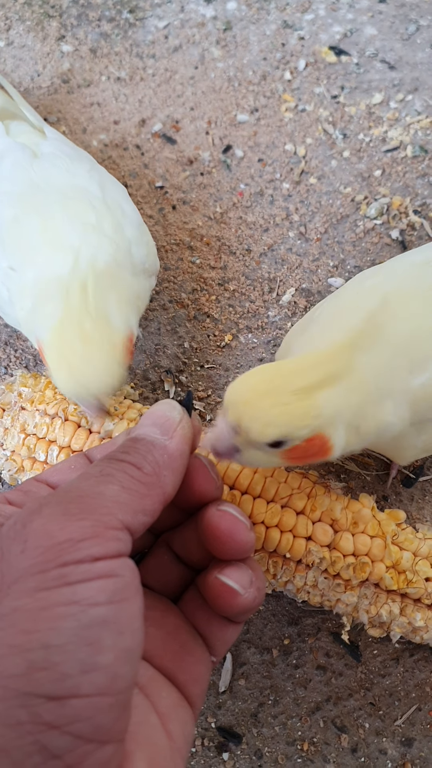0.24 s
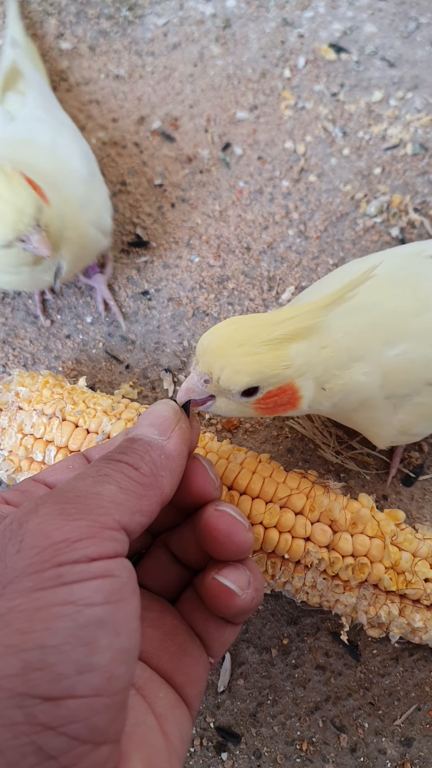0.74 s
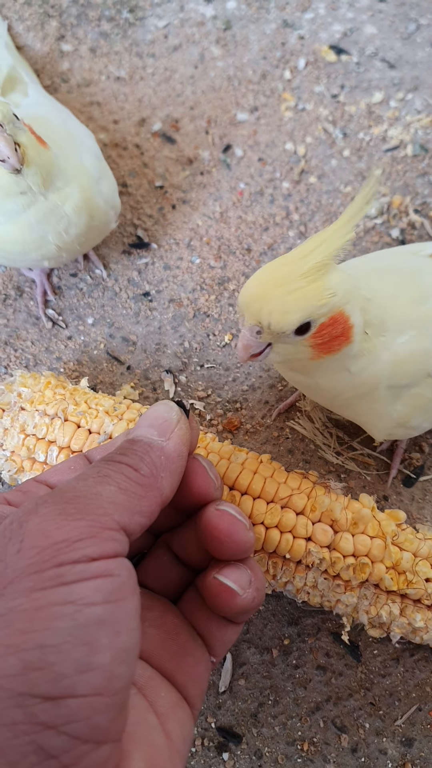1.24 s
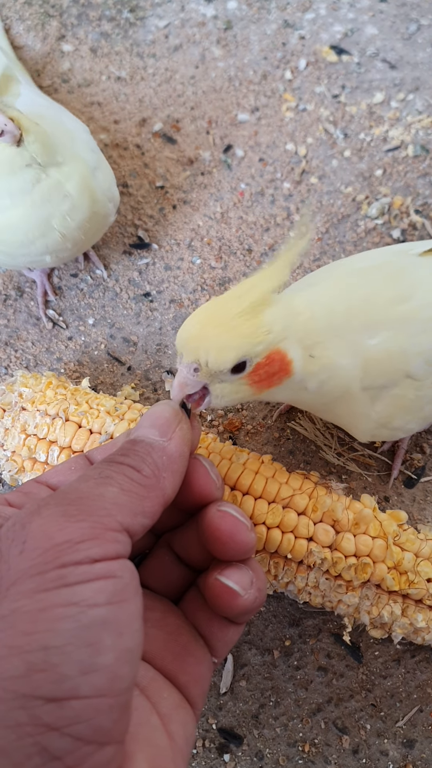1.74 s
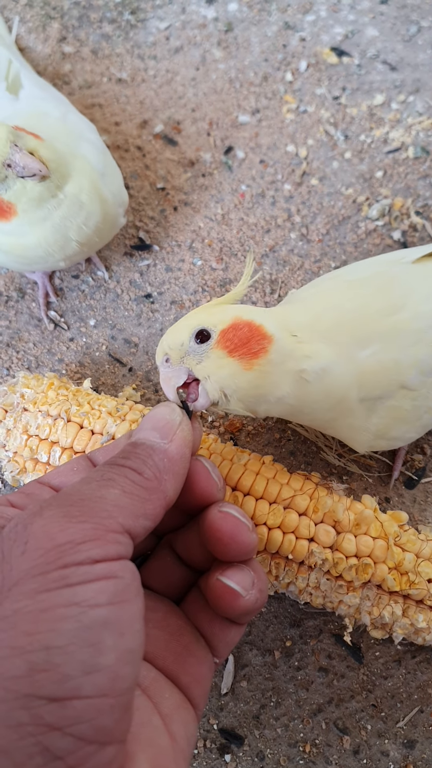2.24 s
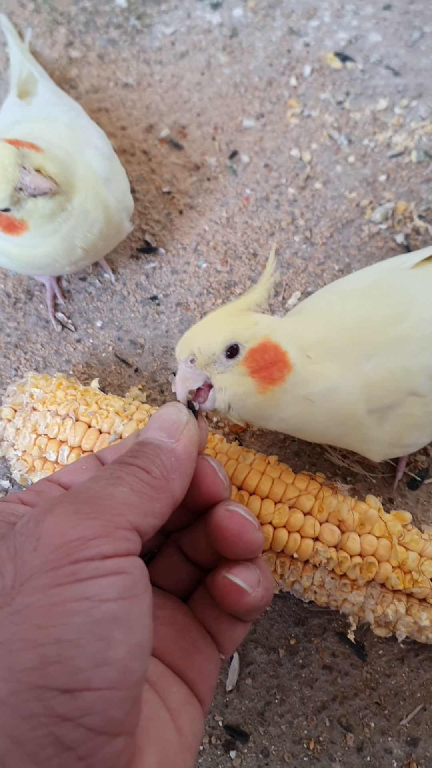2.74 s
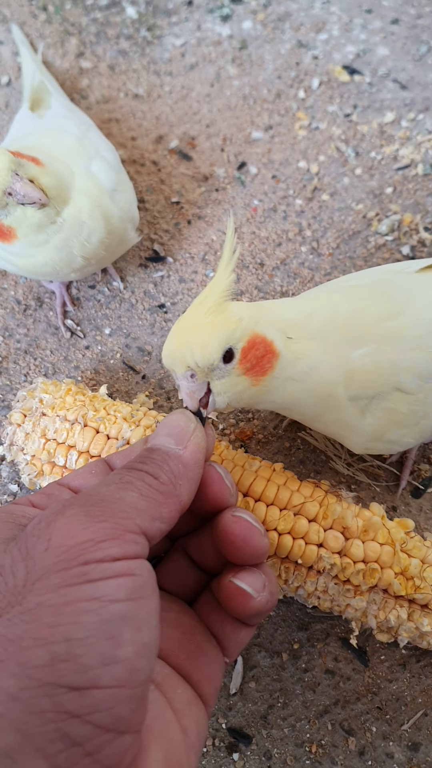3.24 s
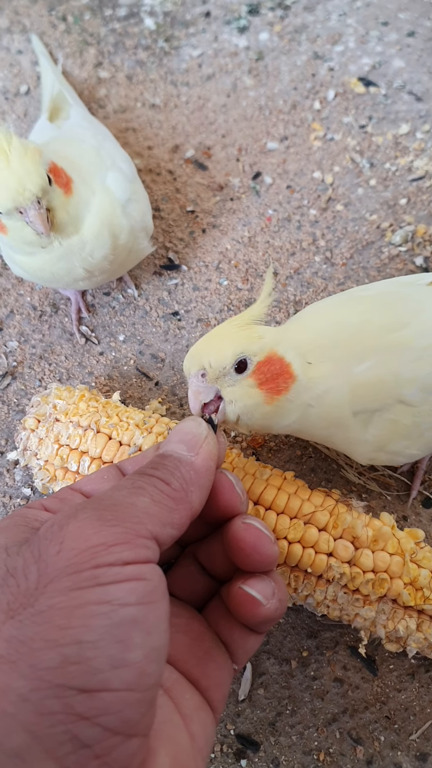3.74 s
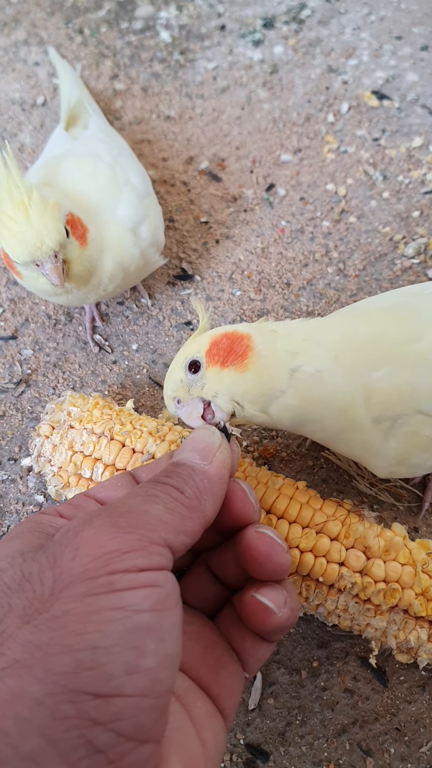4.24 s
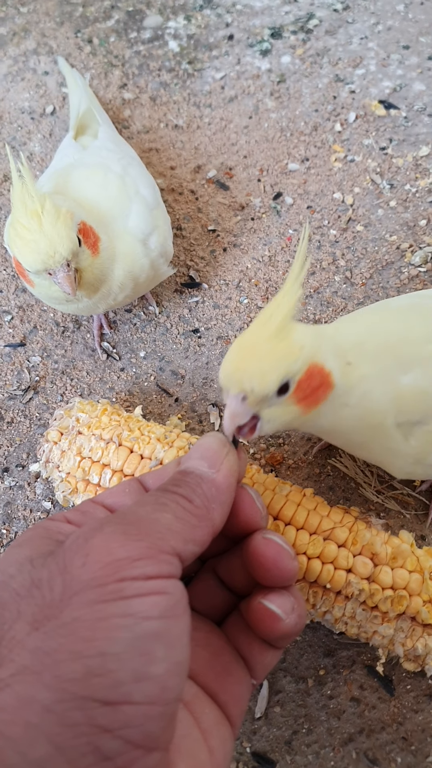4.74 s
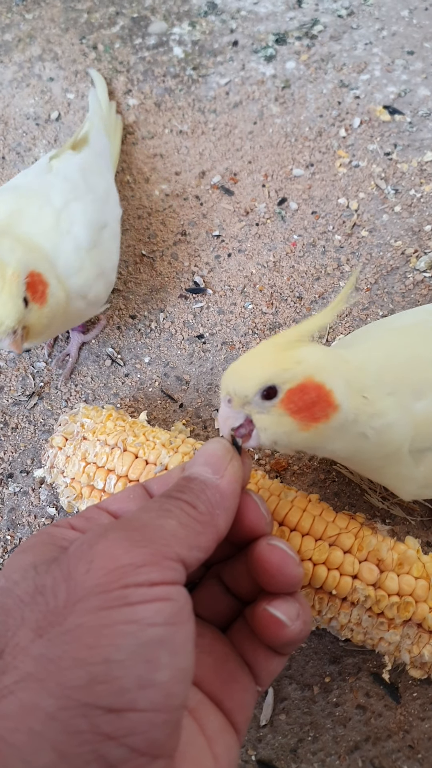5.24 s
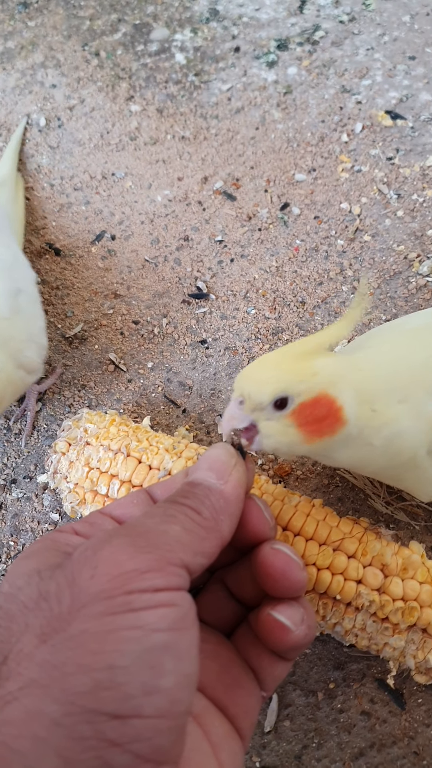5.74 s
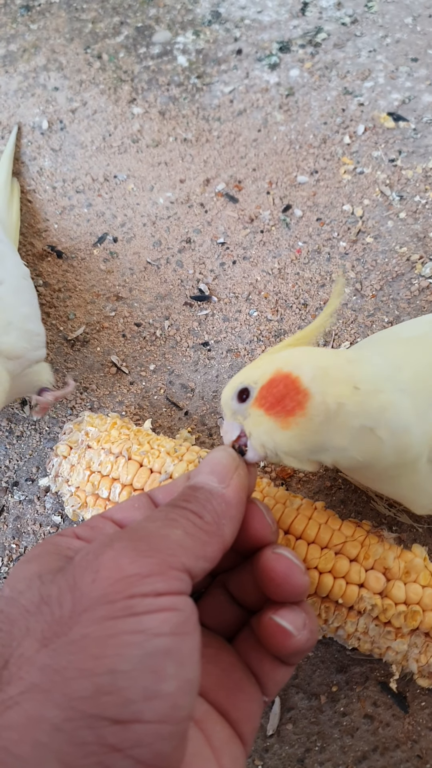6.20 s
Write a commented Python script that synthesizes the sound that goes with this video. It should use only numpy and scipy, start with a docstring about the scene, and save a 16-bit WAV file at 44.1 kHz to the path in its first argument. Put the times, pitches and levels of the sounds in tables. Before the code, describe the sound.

Cockatiels give loud, raspy, rising and arching calls in an echoing hard-walled yard, with tiny seed-husk snaps close up over a low hum.

```python
"""Cockatiels call in a hard-walled yard while one of them cracks seeds from a hand close to the phone.
Each call is a raspy stack of overtones that arches or climbs in two steps, louder as it rises.
Dense echoes from the walls hold every pitch on, so the glides smear; the seed husks are short noise snaps.
Knocks (noise and ringing tones) come mostly by way of the walls; the soft bumps are swells of dull noise.
Beneath lie outdoor noise, a fading hiss, fluttering rumble, a wavering machine hum and a faint low tone."""
import sys
import numpy as np
from scipy import signal
from scipy.fft import rfft, irfft, next_fast_len
from scipy.io import wavfile
from scipy.ndimage import uniform_filter1d, minimum_filter1d

SR = 44100
rng = np.random.default_rng(int(sys.argv[2]) if len(sys.argv) > 2 else 0)


def generate_wav(sig):
    """Save sig (samples, or channels by samples) to the path in sys.argv[1] as 16-bit PCM at SR."""
    pcm = np.round(np.clip(np.atleast_2d(sig).T, -1, 1) * 32767).astype(np.int16)
    wavfile.write(sys.argv[1], SR, pcm)


N = 285327
TIME = np.arange(N) / SR


def undb(db):
    """Decibels to gain."""
    return 10 ** (np.asarray(db) / 20)


def unit(x):
    """Scale to rms 1."""
    return x / np.sqrt(np.mean(x ** 2))


def at_hz(points, hz):
    """Read (Hz, value) points on a log-frequency axis."""
    point_hz, value = np.transpose(points)
    return np.interp(np.log(np.maximum(hz, 1)), np.log(point_hz), value)


def colour(x, points, tilt_db=0, pivot_hz=4000):
    """Filter x by a curve of (Hz, dB) points, tilted by so many dB an octave around the pivot."""
    hz = np.maximum(np.fft.rfftfreq(x.shape[-1], 1 / SR), 1)
    gain_db = at_hz(points, hz) + tilt_db * np.log2(hz / pivot_hz)
    return irfft(rfft(x) * undb(gain_db), x.shape[-1])


def wander(rate_hz, size=N):
    """Smooth random motion up to a rate, rms 1."""
    hz = np.fft.rfftfreq(size, 1 / SR)
    lowpass = 1 / (1 + (hz / rate_hz) ** 4)
    return unit(irfft(rfft(rng.standard_normal(size)) * lowpass, size))


def air_noise(points, alike_hz=520):
    """Diffuse noise at two microphone ports: alike in the bass, unrelated in the treble."""
    hz = np.fft.rfftfreq(N, 1 / SR)
    alike = 1 / (1 + (hz / alike_hz) ** 2.8)
    spectra = rfft(rng.standard_normal((2, next_fast_len(N))))[:, :len(hz)]
    mid, side = spectra * np.sqrt([1 + alike, 1 - alike]) * undb(at_hz(points, hz))
    return unit(irfft([mid + side, mid - side], N))


def add(out, x, start_s):
    """Mix x into out from a start time on."""
    i = max(int(start_s * SR), 0)
    out[..., i:i + x.shape[-1]] += x[..., :out.shape[-1] - i]


def ramp(t, start_s, length_s):
    """Go from 0 to 1 over a length of time."""
    return np.clip((t - start_s) / length_s, 0, 1)


def swell(when_s, spread_s):
    """A smooth bell-shaped rise and fall around a moment."""
    return np.exp(-.5 * ((TIME - when_s) / spread_s) ** 2)


# spectrum of the open air around the yard: freq_hz, relative density_db (per Hz)
AMBIENT_SPECTRUM = [(25, -36.5), (48, -30.5), (64, -4), (86, 0.5), (172, -7.5), (250, -11.5), (335, -9.5),
                    (438, -18), (621, -11.5), (790, -18), (1120, -18.5), (2020, -27.5), (3000, -29.5),
                    (4200, -38.5), (6200, -40.5), (7600, -56.5), (11000, -56), (15000, -69)]


def ambient(level_db=-48.5, swell_db=1):
    """Outdoor noise from all around, its level wandering slightly."""
    return air_noise(AMBIENT_SPECTRUM) * undb(level_db + swell_db * wander(4))


# spectrum of the hiss: freq_hz, relative density_db (per Hz)
HISS_SPECTRUM = [(120, -26), (200, -4.5), (211, -11), (422, -19), (479, -2.5), (525, -29.5), (630, -8),
                 (874, -11.5), (3120, -10), (6130, -17.5), (7480, -31.5), (11000, -27.5), (15500, -32)]


def hiss(level_db=-50.5, hold_s=2.66, fade_db_per_s=11.5, rest_db=-68, flicker_db=1):
    """Coloured noise that holds, then fades down to a faint rest, flickering a little."""
    fade_db = fade_db_per_s * np.maximum(TIME - hold_s, 0)
    course_db = np.maximum(level_db - fade_db, rest_db)
    return air_noise(HISS_SPECTRUM) * undb(course_db + flicker_db * wander(17))


# spectrum of the rumble: freq_hz, relative density_db (per Hz)
RUMBLE_SPECTRUM = [(20, -19.5), (40, -1), (60, -1.5), (80, 12), (100, -6.5), (160, -10.5), (300, -16.5),
                   (700, -48.5)]
# moments when the rumble swells: centre_s, level_db (before the flutter), spread_s
RUMBLE_SWELLS = [(.6, -37.5, 0.14), (0.874, -38, 0.066), (1.32, -42, 0.17), (1.983, -42, 0.18),
                 (2.616, -43, 0.14), (4.85, -48.5, 0.041)]


def rumble(rest_db=-62, flutter_hz=11.5, flutter_db=3):
    """Bass noise swells out of a faint rest while its level flutters evenly."""
    strength = undb(rest_db)
    for centre_s, level_db, spread_s in RUMBLE_SWELLS:
        strength = strength + undb(level_db) * swell(centre_s, spread_s)
    flutter = undb(flutter_db * np.sin(2 * np.pi * flutter_hz * TIME))
    return air_noise(RUMBLE_SPECTRUM) * strength * flutter


# tones of the machine, lowest first: pitch_hz (centre), level_db (rms, before it wavers)
HUM_TONES = [(82, -50.5), (116, -54), (153, -57.5), (234, -60)]


def hum(drift_hz=3.545, swell_db=3, dip_at_s=4.25, dip_spread_s=0.23, dip_db=7.5):
    """Low machine tones that waver in pitch and strength; the lowest sinks for a moment."""
    tones = []
    for pitch_hz, level_db in HUM_TONES:
        strength = undb(level_db + swell_db * wander(17))
        phase = 2 * np.pi * np.cumsum(pitch_hz + drift_hz * wander(8.07)) / SR
        tones.append(strength * np.sin(phase))
    tones[0] = tones[0] * undb(-dip_db * swell(dip_at_s, dip_spread_s))
    return np.sqrt(2) * sum(tones)


# two short notes of the low tone: start_s, length_s, level_db (rms at the crest)
LOW_TONE_NOTES = [(0.22, 0.094, -48.5), (0.312, 0.076, -47)]


def low_tone(pitch_hz=725):
    """A faint sine sounds twice, briefly, behind the second call, each time under a half-sine arch."""
    strength = 0
    for start_s, length_s, level_db in LOW_TONE_NOTES:
        strength = strength + undb(level_db) * np.sin(np.pi * ramp(TIME, start_s, length_s))
    return np.sqrt(2) * strength * np.sin(2 * np.pi * pitch_hz * TIME)


# soft low bumps: centre_s, level_db, spread_s, pitch_hz (where the noise is strongest)
BUMPS = [(0.545, -50.5, 0.36, 404), (1.418, -49.5, 0.09, 256), (2.203, -48.5, 0.079, 468),
         (3.292, -42.5, 0.02, 203), (3.365, -44, 0.077, 167), (4.813, -65, 0.027, 150.4),
         (4.918, -43.5, 0.072, 200)]


def bumps():
    """Soft, dull bumps: noise strongest around one pitch that swells and fades."""
    out = 0
    for centre_s, level_db, spread_s, pitch_hz in BUMPS:
        band = [(pitch_hz / 3, -20), (pitch_hz, 0), (pitch_hz * 2, -10),
                (pitch_hz * 8, -40), (pitch_hz * 32, -65)]
        out = out + air_noise(band) * undb(level_db) * swell(centre_s, spread_s)
    return out


# how long the walls hold each frequency: freq_hz, t60_s (time to decay by 60 dB)
YARD_DECAY = [(300, .5), (1500, .46), (3000, .46), (4000, .39), (6000, .41), (10000, .38), (16000, .32)]


def yard(x, build_s=.006, early=0.94, early_s=0.032):
    """Dense wall echoes, stronger early on, with a decay time for each frequency; each port gets its own."""
    t = np.arange(SR) / SR
    hz, when_s, cells = signal.stft(rng.standard_normal((2, SR)), SR, nperseg=256)
    decay = np.exp(-np.log(1000) * when_s / at_hz(YARD_DECAY, hz)[:, None])
    tail = signal.istft(cells * decay, SR)[1][:, :SR]
    tail = tail * (1 - np.exp(-t / build_s)) * (1 + early * np.exp(-t / early_s))
    tail /= np.sqrt(np.sum(tail ** 2, axis=1, keepdims=True))  # unit energy
    return signal.fftconvolve(x, tail, axes=1)[:, :x.shape[1]]


# light knocks further off: start_s, level_db (before the paths), thud_db and ring_db (relative trims)
KNOCKS = [(0.856, -27, -22, -8.5), (1.911, -25, 3.5, -5), (2.548, -26, -18, -19), (3.489, -28, -13.5, 1.5)]
# spectrum of the sharp contact: freq_hz, gain_db
CONTACT_SPECTRUM = [(500, -5), (1500, -0.5), (3000, 4), (5000, 4.5), (7500, -12), (11000, -16.5),
                    (15000, -18.5)]
# what the knocks ring with: pitch_hz, level_db (relative), t60_s
KNOCK_RING = [(2180, -5.5, 0.22), (2930, 2, 0.041), (3220, -3, 0.39), (3644, -12.5, .2), (5000, -18, 0.17),
              (5210, -4, .16), (6200, -7.5, 0.22)]


def knocks(decay_s=0.0041, thud_hz=650, thud_s=0.025, ringing_db=-17, direct_db=-8, echo_db=-3):
    """A sharp noise contact, a dull noise thud and decaying tones, heard mostly by way of the walls."""
    out, t = np.zeros((2, N)), np.arange(SR // 3) / SR
    thud_band = signal.butter(2, [thud_hz / 2, thud_hz * 1.42], "band", fs=SR, output="sos")
    ring = 0
    for pitch_hz, level_db, t60_s in KNOCK_RING:
        ring = ring + undb(level_db) * np.sin(2 * np.pi * pitch_hz * t) * np.exp(-np.log(1000) * t / t60_s)
    for start_s, level_db, thud_db, ring_db in KNOCKS:
        noise = rng.standard_normal((2, len(t)))
        contact = unit(colour(noise, CONTACT_SPECTRUM)) * np.exp(-t / decay_s)
        thud = 0.22 * unit(signal.sosfilt(thud_band, noise)) * np.exp(-t / thud_s)
        knock = contact + undb(thud_db) * thud + undb(ring_db + ringing_db) * ring
        add(out, undb(level_db) * knock, start_s)
    return undb(direct_db) * out + undb(echo_db) * yard(out)


# seed husks snapping in the beak: start_s, peak_db (before pan and echo), tilt_db (brightness per octave)
SEED_CRACKS = [(3.255, -23, -1), (3.305, -25, -1.5), (3.637, -53.5, 7), (4.308, -44.5, -0.5),
               (4.336, -39.5, 2.5), (5.318, -19.5, -4), (5.564, -41, 2), (5.703, -59.5, 12.5),
               (6.461, -25, -18)]
# spectrum of a snapping husk before its tilt: freq_hz, gain_db
HUSK_SPECTRUM = [(700, -34.5), (1500, 6.5), (4000, 7), (6500, -1.5), (8000, -13.5), (11000, -7),
                 (15000, -9)]


def seeds(decay_s=.0016, echo_db=-8, pan_db=4):
    """Husks snap close to the phone: very short noise bursts, nearly dry, stronger at the left port."""
    out, t = np.zeros((2, N)), np.arange(SR // 20) / SR
    port_db = np.array([[pan_db], [-pan_db]]) / 2
    for start_s, peak_db, tilt_db in SEED_CRACKS:
        snap = colour(rng.standard_normal((2, len(t))), HUSK_SPECTRUM, tilt_db) * np.exp(-t / decay_s)
        add(out, snap / np.abs(snap).max() * undb(peak_db + port_db), start_s)
    return out + undb(echo_db) * yard(out)


def arch(rise_s, hold_s, fall_s, first_hz, top_hz, last_hz, bend, fall_bend=0.57):
    """Pitch of an arched call: climb, hold, then a fall that breaks away fast and slows."""
    t = np.arange(0, rise_s + hold_s + fall_s, 1 / SR)
    climb = ramp(t, 0, rise_s) ** bend
    fall = ramp(t, rise_s + hold_s, fall_s) ** fall_bend
    return first_hz * (top_hz / first_hz) ** climb * (last_hz / top_hz) ** fall


def two_steps(rise_s, sag_s, second_s, first_hz, top_hz, second_hz, bend,
              sag_share=.07, droop_share=0.0395, step_s=0.049):
    """Pitch of a stepped call: climb, sag by a share, step up, droop by a share."""
    t = np.arange(0, rise_s + sag_s + second_s, 1 / SR)
    climb = ramp(t, 0, rise_s) ** bend
    first = first_hz * (top_hz / first_hz) ** climb * (1 - sag_share * ramp(t, rise_s, sag_s))
    second = second_hz * (1 - droop_share * ramp(t, rise_s + sag_s, second_s) ** 2)
    return first + (second - first) * ramp(t, rise_s + sag_s, step_s)


def effort(octaves, attack_s, db_per_octave=9.5, attack_db=7, release_s=0.038, release_db=10):
    """Strength of a call in dB: higher notes are louder, between an attack and a release."""
    t = np.arange(len(octaves)) / SR
    attack = attack_db * (1 - ramp(t, 0, attack_s))
    release = release_db * ramp(t, t[-1] - release_s, release_s)
    return db_per_octave * octaves - attack - release


# response of throat and open beak: freq_hz, gain_db
THROAT = [(1200, -0.5), (1600, -6.5), (2200, -2.5), (3000, -3), (3700, -0.5), (4500, -10), (5200, -11.5),
          (5900, -26.5), (7200, -29), (8600, -38.5), (9700, -45), (11400, -43), (13000, -43), (15000, -46)]
# spectrum of the air rushing through the throat: freq_hz, gain_db
RUSH_SPECTRUM = [(1100, -38.5), (1700, -12.5), (2200, 2), (3500, -12), (4700, 13.5), (5600, 4),
                 (6800, -34.5), (9000, -28.5), (15000, -38)]
# the thin sheen above the main overtones: the frequencies (Hz) at which its level is set
SHEEN_HZ = (8500, 11400, 15000)


def syrinx(hz, effort_db, lift_db, rasp, sheen_db, waver=0.0075, jitter=0.33, fray=3.1,
           lowest_hz=1300, rush_db=-15, count=12, deepest_sag=.58, edge_s=.01):
    """One call: a harmonic stack whose pitch and strength shake with the rasp, shaped by the throat."""
    t = np.arange(len(hz)) / SR
    hz = hz * (1 + waver * wander(60, len(t)))
    # rough cycles drag: the pitch sags at most a set share of the way to the bird's lowest note
    drag = rasp * jitter * np.maximum(wander(170, len(t)), 0) ** 2
    sag = deepest_sag * np.tanh(drag / deepest_sag)
    phase = 2 * np.pi * np.cumsum(hz - sag * np.maximum(hz - lowest_hz, 0)) / SR
    k = np.arange(1, count + 1)[:, None]
    # the overtones fray into bands, the high ones most
    slip = rasp * fray * np.sqrt(k - 1) * np.array([wander(220, len(t)) for _ in k])
    partial_db = at_hz(THROAT, k * hz) + (k > 1) * lift_db
    partial_db += np.interp(k * hz, (6000, *SHEEN_HZ), (0, *sheen_db))
    # the sheen grows with the pitch and fades over the length of the call
    gleam_db = 2.5 * np.log2(hz / hz.max()) - 9 * t / t[-1]
    partial_db += gleam_db * np.interp(k * hz, (6000, SHEEN_HZ[0]), (0, 1))
    audible = k * hz < SR / 2
    stack = np.sqrt(2) * np.sum(undb(partial_db) * audible * np.sin(k * phase + slip), axis=0)
    rush_noise = unit(colour(rng.standard_normal(len(t)), RUSH_SPECTRUM))
    rush = rasp * undb(rush_db + lift_db) * rush_noise
    gate = np.clip(np.minimum(t, t[-1] - t) / edge_s, 0, 1)
    flutter = np.exp(.7 * rasp * wander(120, len(t)))
    return (stack + rush) * gate * flutter * undb(effort_db)


# the straight path to the phone is shaded, so its treble is dull: freq_hz, gain_db
SHADE = [(3000, 0), (4500, -2.5), (7000, -7), (15000, -10)]
# level of the sheen before a call shifts and tilts it: gain_db at each of SHEEN_HZ
SHEEN_DB = (-1.5, 5.5, 0)
# calls that climb, hold their top note and fall: start_s, rise_s, hold_s, fall_s, first_hz, top_hz, last_hz,
# bend (exponent of the climb: 1 even, more = slow start), level_db (before effort and paths), attack_s,
# lift_db (overtones), rasp (0-1), sheen_db, sheen_tilt_db (per octave), lead_ms (of the left port)
ARCHED_CALLS = [ (-.1, 0.065, 0.13, .036, 2324, 2958, 1750, 1.32, -10, 0.015, -2, 0.26, 1.9, -21.5, .36),
                (1.083, 0.15, 0.037, 0.03, 1198, 3542, 3228, .95, -14.5, 0.14, 7, .37, 3.5, 7.5, 0),
                (1.455, 0.14, 0.062, .112, 1320, 2988, 1900, .85, -11, 0.0056, -3, 0.24, 1.8, 25, .18),
                (2.935, .128, 0.039, 0.12, 1256, 2660, 1710, 1.48, -15.5, 0.021, 0.05, 0.21, 4.5, 18.5, .5),
                (3.825, .074, 0.11, 0.025, 1530, 2827, 2676, 1.3, -11, .07, -6, .25, 1.7, -24.5, .43),
                (4.857, .158, .06, 0.13, 1218, 3136, 1930, 0.96, -12, 0.045, -0.55, 0.28, 0.45, 25.5, .45)]
# calls that climb to a first note, sag, then step up to a higher one:
# start_s, rise_s, sag_s, second_s (length of the second note), first_hz, top_hz, second_hz,
# bend, level_db, attack_s, lift_db, rasp, sheen_db, sheen_tilt_db, lead_ms (all as above)
STEPPED_CALLS = [ (.238, 0.082, 0.064, 0.081, 1518, 3069, 3320, 1.0, -12.5, 0.0057, 5, 0.37, -3, -4, .45),
                 (.925, .07, .082, .125, 1520, 2974, 3270, 1.1, -13, .014, -1.5, .29, -3.5, -15.5, .34),
                 (6.09, .096, .058, 0.1, 1589, 2953, 3400, 2.5, -12.5, 0.076, -2.5, .35, 0, -18, 0.42)]


def cockatiels(pan_db=-0.93, direct_db=-3, echo_db=-1.7, lead_in_s=.1, rasp_swing=0.331, glide=4.46):
    """Every call reaches the two ports straight, then from the walls; the first is already under way."""
    lead_in = int(lead_in_s * SR)
    direct, to_walls = np.zeros((2, 2, lead_in + N))
    port_gain = undb(np.array([[pan_db], [-pan_db]]) / 2)
    sheen_octaves = np.log2(np.array(SHEEN_HZ) / SHEEN_HZ[1])
    # the last entry is how overtone lift changes with pitch, in dB per octave
    kinds = (ARCHED_CALLS, arch, -1.7), (STEPPED_CALLS, two_steps, 4)
    for calls, pitch, lift_slope in kinds:
        for start_s, *shape, level_db, attack_s, lift_db, rasp, sheen_db, tilt_db, lead_ms in calls:
            hz = pitch(*shape)
            octaves = np.log2(hz / hz.max())
            # a climbing voice is rougher, a falling one clearer; glide is in octaves per second
            climb_rate = np.gradient(octaves) * SR
            roughness = rasp * (1 + rasp_swing * np.tanh(climb_rate / glide))
            sheen = np.array(SHEEN_DB) + sheen_db + tilt_db * sheen_octaves
            strength_db = level_db + effort(octaves, attack_s)
            call = syrinx(hz, strength_db, lift_db + lift_slope * octaves, roughness, sheen)
            call = call * port_gain
            add(direct[0], call[0], start_s + lead_in_s)
            add(direct[1], call[1], start_s + lead_in_s + lead_ms / 1000)
            add(to_walls, call, start_s + lead_in_s)
    straight = undb(direct_db) * colour(direct, SHADE)
    echoes = undb(echo_db) * yard(to_walls)
    return (straight + echoes)[:, lead_in:]


def scene():
    """All sources at the two microphone ports, from the background to the birds."""
    background = ambient() + hiss() + rumble() + hum() + low_tone()
    return background + bumps() + knocks() + seeds() + cockatiels()


# the phone's two microphone ports, the left one brighter: freq_hz, difference_db (left minus right)
PORTS = [(100, -1.1), (400, -2.5), (1500, -0.5), (3000, -2), (5000, 0.5), (7000, 3.5), (9000, 12.5),
         (12000, 5.5)]


def record(dry, top_hz=15750, ceiling=.95):
    """The ports colour the sound differently; a limiter catches the highest peaks; the top is cut."""
    padded = np.pad(dry, ((0, 0), (0, next_fast_len(N + SR // 10) - N)))
    ports = []
    for x, side in zip(padded, (1, -1)):
        ports.append(colour(x, [(hz, side * db / 2) for hz, db in PORTS]))
    ports = np.array(ports)[:, :N]
    headroom = ceiling / np.maximum(np.abs(ports).max(axis=0), ceiling)
    gain = uniform_filter1d(minimum_filter1d(headroom, size=256), size=256)
    lowpass = signal.ellip(10, .1, 80, top_hz, fs=SR, output="sos")
    return signal.sosfilt(lowpass, ports * gain)


dry = scene()
out = record(dry)
generate_wav(out)
```